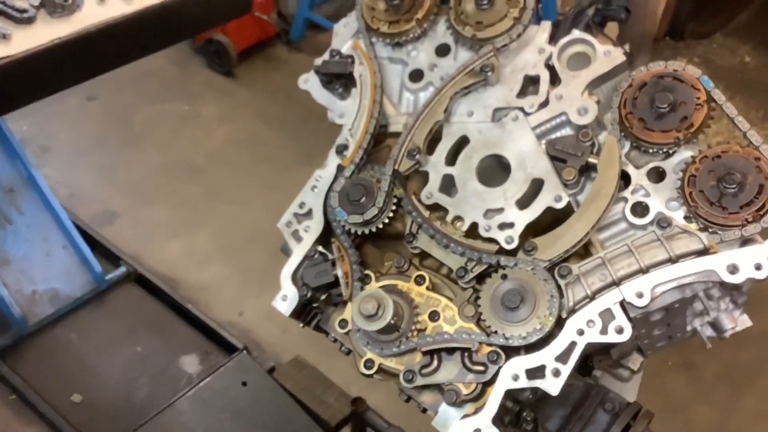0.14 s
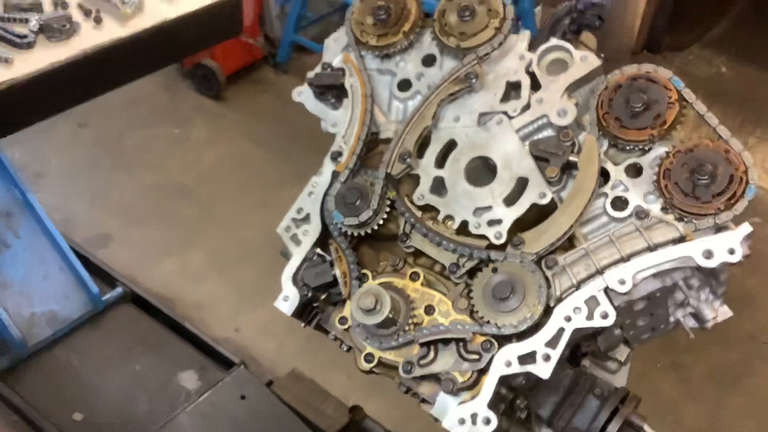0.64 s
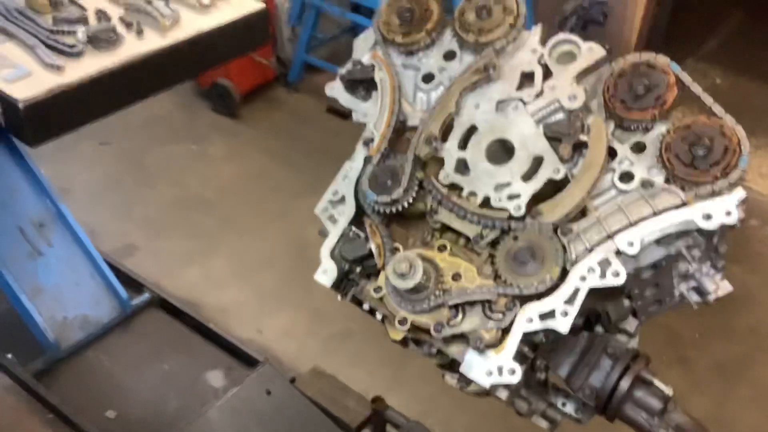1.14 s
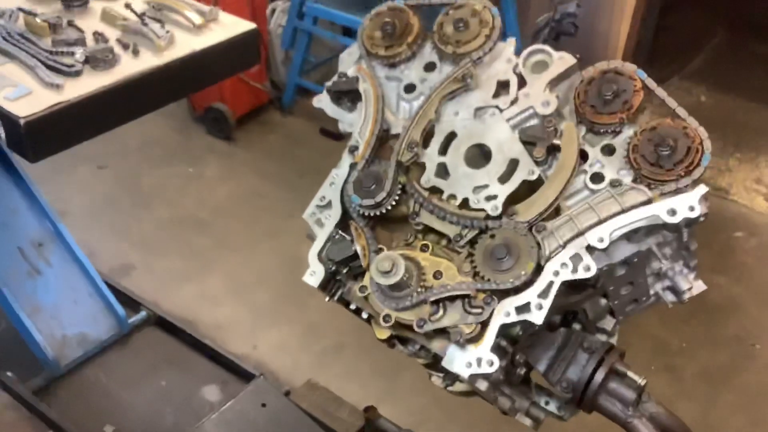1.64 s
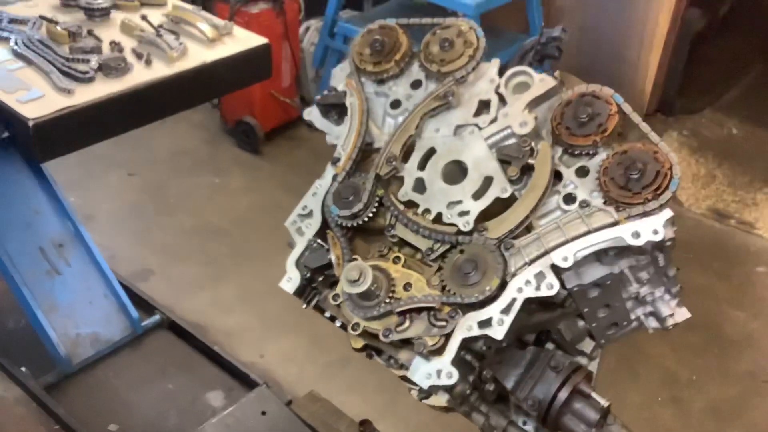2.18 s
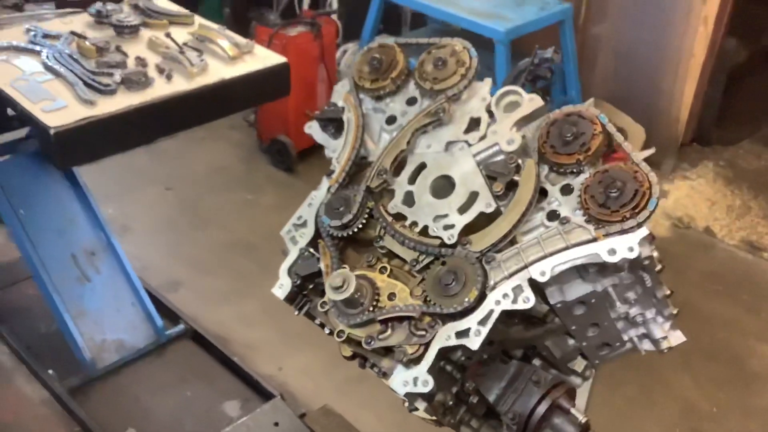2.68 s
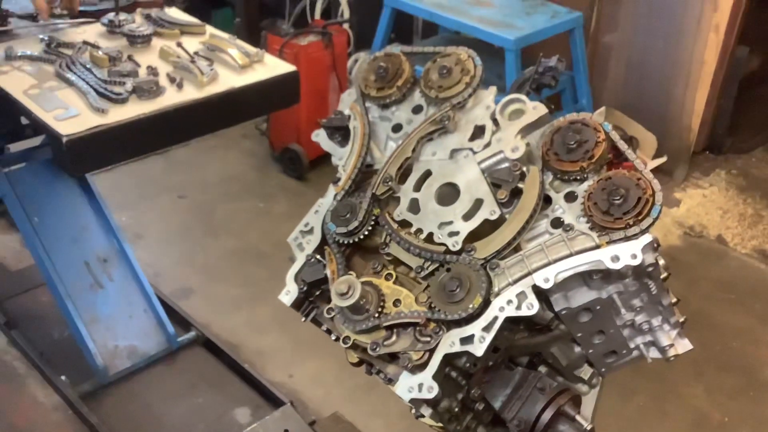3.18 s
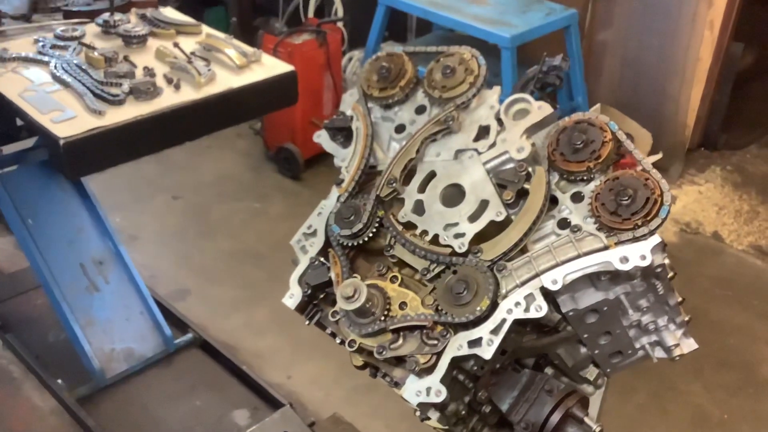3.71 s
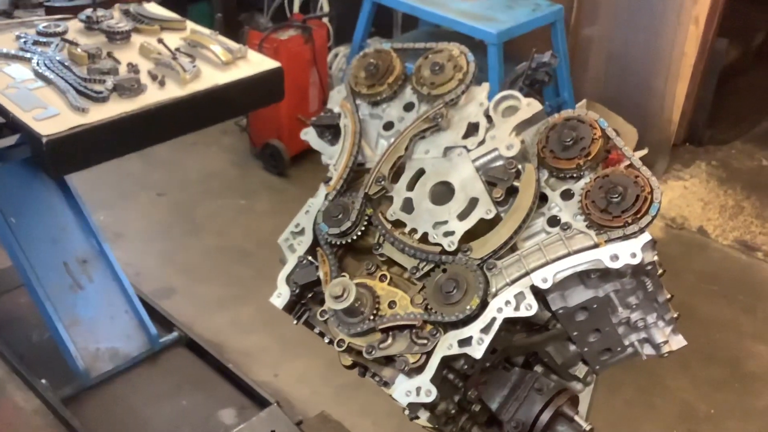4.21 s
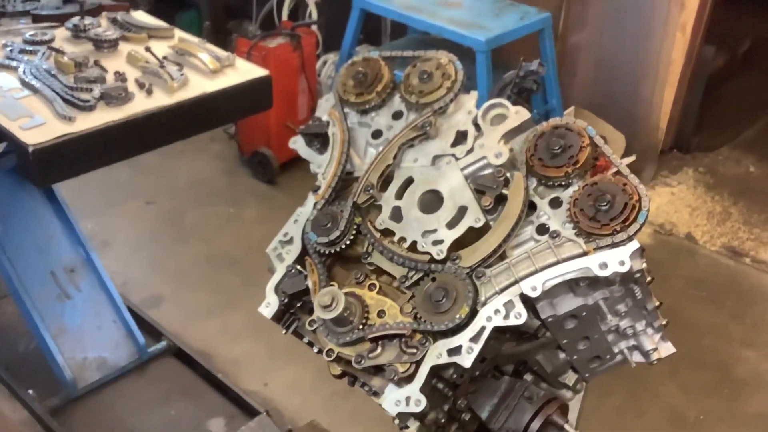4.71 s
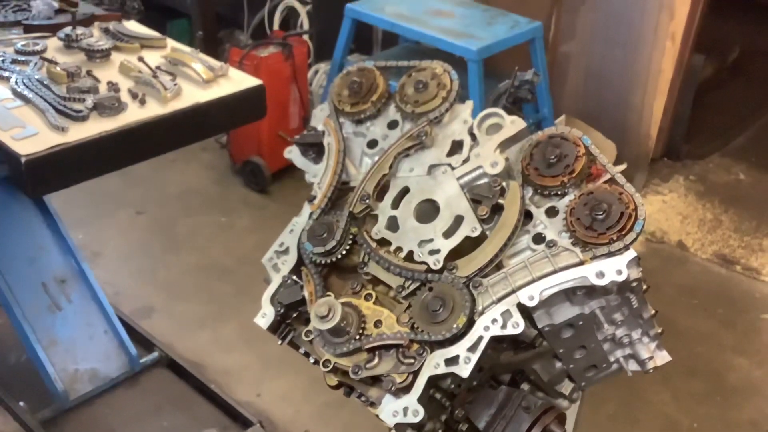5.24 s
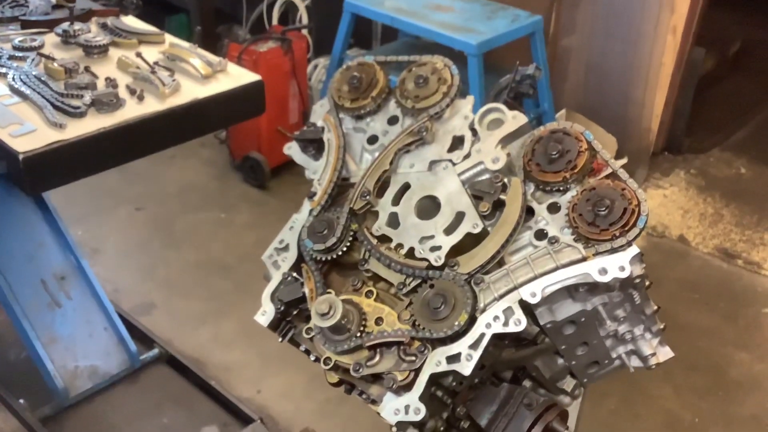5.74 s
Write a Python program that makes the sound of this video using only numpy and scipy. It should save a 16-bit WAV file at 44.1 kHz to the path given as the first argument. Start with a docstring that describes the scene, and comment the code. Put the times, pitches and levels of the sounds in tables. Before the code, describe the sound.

Metal engine parts clank hard on a workbench in a hard-walled garage, with thuds, small taps and clicks over a low steady hum.

```python
"""Metal parts on a garage workbench

Metal parts are knocked and set down on a bench in a hard-walled garage, a few metres from the microphone.
Each blow is a shaped click smeared by noise, with a thud that rings the modes of the bench.
Pings are noise through a resonance; a steel shaft rings in dying sines; faint low bench tones linger.
A small part is tapped; bumps and clicks, filtered puffs of noise, sound close to the microphone.
Dense echoes make the garage; a wavering mains hum, treble hiss and steady room noise lie beneath."""
import sys
import numpy as np
from scipy import signal
from scipy.fft import rfft, irfft
from scipy.io import wavfile
from scipy.ndimage import uniform_filter1d

SR = 44100
rng = np.random.default_rng(int(sys.argv[2]) if len(sys.argv) > 2 else 0)


def invert_db(level):
    """Linear amplitude ratio for a level in decibels (20 dB per decade), elementwise."""
    return 10 ** (np.asarray(level, dtype=float) / 20)


def generate_wav(sig):
    """Save sig (samples, or channels by samples) to the path in sys.argv[1] as 16-bit PCM at SR."""
    pcm = np.round(np.clip(np.atleast_2d(sig).T, -1, 1) * 32767).astype(np.int16)
    wavfile.write(sys.argv[1], SR, pcm)


N = 258757  # length in samples


def evened(x):
    """Scales to rms 1."""
    return x / np.sqrt(np.mean(x ** 2) + 1e-20)


def read(points, hz):
    """Reads a table along log frequency."""
    f, value = np.transpose(points)
    return np.interp(np.log(hz + 1), np.log(f + 1), value)


def coloured(x, points):
    """Filters by a spectrum in dB."""
    hz = np.fft.rfftfreq(len(x), 1 / SR)
    return irfft(rfft(x) * invert_db(read(points, hz)), len(x))


def slow_noise(width):
    """Noise averaged twice over width samples, rms 1."""
    once = uniform_filter1d(rng.standard_normal(N), width)
    return evened(uniform_filter1d(once, width))


def add(mix, s, sound):
    """Mixes a sound in at time s, in seconds."""
    part = mix[round(s * SR):][:len(sound)]
    part += sound[:len(part)]


def ringing(modes, phases):
    """One second of dying sines, one a mode; phases in cycles."""
    t = np.arange(SR) / SR
    total = np.zeros(SR)
    for (hz, db, t60), phase in zip(modes, phases):
        total += invert_db(db - 60 * t / t60) * np.sin(2 * np.pi * (hz * t + phase))
    return total


def burst(noise, rise_s, t60):
    """A rough push that rises fast and dies, energy 1."""
    t = np.arange(len(noise)) / SR
    push = noise * (1 - np.exp(-t / rise_s)) * invert_db(-60 * t / t60)
    return push / np.linalg.norm(push)


def puff(noise, hz, t60, rise_s, sharpness):
    """A rough push through one resonance taken twice, peak 1."""
    band = signal.iirpeak(hz, sharpness, SR)
    push = burst(noise, rise_s, np.clip(t60, .005, .3))
    sound = signal.lfilter(*band, signal.lfilter(*band, push))
    return sound / abs(sound).max()


def causal(db, size=2048):
    """A click of the given smooth spectrum that starts sharply (minimum phase)."""
    log_gain = np.log(invert_db(np.r_[db, db[-2:0:-1]]))
    return np.fft.ifft(np.exp(np.conj(signal.hilbert(log_gain)))).real[:size]


# Where a blow on the bench is shaped. In order: centres of thud, knock, clack, tick and sizzle in Hz.
CONTACT_HZ = [300, 900, 2300, 6000, 12000]


def contact(strength_db, weight_db, hardness_db):
    """One blow: a click whose lows grow with weight and whose treble grows with hardness."""
    thud_hz, knock_hz, clack_hz, tick_hz, sizzle_hz = CONTACT_HZ
    low_hz, low_db = 110, -27  # the fall below the thud
    # levels over the clack; the factors are dB per dB
    thud_db = 14.5 + weight_db
    knock_db = 5.5 + 0.52 * weight_db
    sizzle_db = -21.5 + 0.31 * hardness_db - 0.39 * strength_db
    shape = [(low_hz / 4, thud_db + 1.1 * low_db), (low_hz, thud_db + low_db),
             (thud_hz, thud_db), (knock_hz, knock_db), (clack_hz, 0),
             (tick_hz, hardness_db), (sizzle_hz, sizzle_db), (SR / 2, sizzle_db - 15)]
    spectrum_db = read(shape, np.fft.rfftfreq(4096, 1 / SR))
    return invert_db(strength_db) * causal(uniform_filter1d(spectrum_db, size=5))


# Modes of the bench under the parts. Each row: frequency in Hz, relative level in dB, t60 in seconds.
BENCH = [(218.8, -3.5, 0.3), (235.3, -2.5, .2), (272.4, -1.5, .15), (297, -1.5, .12), (329, -6, 0.079),
         (420, -6, .1), (507, -7, .1), (606, -5.5, .14), (697, -3.5, .12)]


def bench_ring(thuds):
    """The bench top answers the thuds with its modes, which swell in before they die."""
    swell = 1 - np.exp(-np.arange(SR) / (.005 * SR))
    modes = swell * ringing(BENCH, np.zeros(len(BENCH)))
    bench = invert_db(-34.5) * signal.fftconvolve(thuds, modes)[:N]
    # the bench sound is cut below 150 Hz
    return signal.sosfilt(signal.butter(2, 150, "high", fs=SR, output="sos"), bench)


# Blows on the bench, a few metres off. Each row: start in seconds, relative strength in dB,
# relative weight (thud over clack) in dB, hardness (tick over clack) in dB.
BLOWS = [(0.11, -55, 1, -11), (0.8536, 0.5, -38, -8), (0.8652, -11, -10, 8), (0.885, -15, -6, -21),
         (0.9397, -11.5, -19, -1.5), (1.4494, -73.5, 19, 19), (1.74, -64.5, -4.5, 7.5),
         (1.992, -15.5, -2, -22), (2.1654, -14, -1.5, -19), (2.2346, -29, 6, -15), (2.7325, -53, -5, -5),
         (2.7755, -54.5, 2.5, -13.5), (3, -78, 12, 27.5), (3.2889, -2, -21.5, -10.5),
         (3.3099, -8.5, -8, -17), (3.4225, -20, -8.5, -19), (3.4981, -20, -7, -24), (3.5876, -50.5, 9, -15),
         (3.7442, -33.5, -20.5, -25.5), (3.913, -41.5, -13, -28), (3.9334, -52.5, -4.5, -17),
         (4.178, -58, -2, 3), (4.3228, -52.5, -1, -12), (4.3562, -28, -19, -6.5), (4.7045, -18.5, 0, -15),
         (5.3502, -69.5, 17.5, 13), (5.4288, -69.5, 12, -1), (5.8281, -65.5, 19, 12.5)]


def blows():
    """Each blow clicks, chatters and pushes the bench; gentle ones smear into a short scrape.

    Returns the direct sound and the sound sent into the garage."""
    firm_db, gentle_span_db = -26, 12
    thud_lag_s, thud_edge_hz = .012, 600  # the lows travel through the bench and swell later
    lowpass = signal.butter(2, thud_edge_hz, fs=SR)
    blunt = np.hanning(48)  # the push of a blunt contact
    clicks, chatter, thuds = np.zeros((3, N))
    noise = rng.standard_normal((len(BLOWS), 4096))
    for (s, strength_db, weight_db, hardness_db), rough in zip(BLOWS, noise):
        click = contact(strength_db, weight_db, hardness_db)
        gentle = np.clip((firm_db - strength_db) / gentle_span_db, 0, 1)
        low = signal.lfilter(*lowpass, click)
        high_push = burst(rough, 0.007 + .004 * gentle, .028 + 0.12 * gentle)
        low_push = burst(rough[::-1], thud_lag_s, 0.042 + .03 * gentle)
        smeared = signal.fftconvolve(click - low, high_push) + signal.fftconvolve(low, low_push)
        add(chatter, s, smeared)
        add(clicks, s, (1 - gentle) * click)
        add(clicks, s, gentle * smeared)
        add(thuds, s, invert_db(strength_db + weight_db) * blunt)
    bench = bench_ring(thuds)
    direct = invert_db(23.0) * chatter + bench
    radiated = invert_db(25.0) * clicks + invert_db(-4) * bench
    return direct, radiated


# Modes of the steel shaft at the bench. Each row: frequency in Hz, relative level in dB, t60 in seconds.
SHAFT = [(8608, -17, .45), (9446, -7, .3), (9649, 0, .42), (9735, -5, .26)]
# Rings of the shaft and bursts at its lowest mode. Each row: start in seconds, relative level in dB,
# extra dB in the lowest mode.
RINGS = [(.8555, -10, -15), (0.878, -15, -12), (2.737, -62.5, -6), (2.78, -66, -6), (3.2866, -38.5, -4),
         (3.309, -46, 3.5), (3.391, -49, 23.5), (3.421, -44, 2), (3.553, -55, 12)]


def shaft():
    """Each row adds a fresh ring of the modes over the earlier ones; loose parts touch the ringing shaft and
    make it flicker."""
    mix = np.zeros(N)
    rise = 1 - np.exp(-np.arange(SR) / (.004 * SR))
    (low_hz, low_db, low_t60), *upper = SHAFT
    for (s, db, extra_db), phases in zip(RINGS, rng.random((len(RINGS), len(SHAFT)))):
        modes = [(low_hz, low_db + extra_db, low_t60), *upper]
        add(mix, s, invert_db(db) * rise * ringing(modes, phases))
    return mix * invert_db(2.26 * slow_noise(500))  # flicker of 2.26 dB rms


# Short pings and jingles with the blows, mostly around 2 kHz.
# Each row: start in seconds, peak level in dB before the overall colour, resonance in Hz.
PINGS = [(0.855, -12.5, 2020), (0.853, -10.5, 3070), (0.889, -13, 2740), (0.943, -18, 2800),
         (1.9903, -14.5, 1980), (2.1638, -11, 2460), (3.2877, -6.5, 2283), (3.3097, -7, 2120),
         (3.311, -32, 11500), (3.42, -30, 11000), (3.425, -22, 629), (3.4994, -21, 1490),
         (3.4988, -22.5, 2250), (3.739, -42, 2410), (3.7457, -38, 2260), (3.91, -45.5, 2313),
         (4.1789, -46.5, 2354), (4.32, -53.5, 2324), (4.343, -51, 2220), (4.3545, -32, 2390),
         (4.36, -30.5, 2166), (2.999, -50, 7000)]


def pings():
    """Each ping is a rough push through one narrower resonance."""
    mix = np.zeros(N)
    for (s, db, hz), noise in zip(PINGS, rng.standard_normal((len(PINGS), 4096))):
        add(mix, s, invert_db(db) * puff(noise, hz, t60=.038, rise_s=0.0024, sharpness=2.8))
    return mix


# Faint low tones of the bench that hang on after some blows.
# Each row: start in seconds, frequency in Hz, starting peak in dB before the overall colour, t60 in seconds.
LINGERS = [(.86, 770, -52, 1.56), (.86, 1053, -56, 1.65), (2.17, 1063, -55.5, 1.2), (2.24, 218, -45.5, 1.4),
           (3.3, 598.6, -54, 2.9)]


def lingers():
    """Each tone is one slowly dying sine, cut after two seconds."""
    mix = np.zeros(N)
    t = np.arange(2 * SR) / SR
    for (s, hz, db, t60), phase in zip(LINGERS, rng.random(len(LINGERS))):
        add(mix, s, invert_db(db - 60 * t / t60) * np.sin(2 * np.pi * (hz * t + phase)))
    return mix


# Modes of a small loose steel part near by. Each row: frequency in Hz, mean relative level in dB,
# t60 in seconds.
FITTING = [(5230, -7, 0.091), (5940, -5.5, 0.069), (7400, -2, .05), (8340, -2.5, 0.088), (8840, -1, 0.066),
           (9600, -8.5, 0.039)]
# Light taps of the small part. Each row: start in seconds, relative level in dB.
TAPS = [(3.8836, -63.5), (3.933, -58), (4.165, -60.5), (4.18, -54), (4.706, -41), (5.35, -57), (5.812, -62)]


def fitting():
    """Each tap is a short rattle that rings the small part, its modes a little differently each time."""
    mix = np.zeros(N)
    spread_db = 4
    for (s, db), draw in zip(TAPS, rng.standard_normal((len(TAPS), 2048))):
        modes = [(hz, mode_db + spread_db * d, t60) for (hz, mode_db, t60), d in zip(FITTING, draw[::-1])]
        ring = ringing(modes, np.zeros(len(FITTING)))
        rattle = burst(draw, 0.00083, .04)
        add(mix, s, invert_db(db) * signal.fftconvolve(ring, rattle))
    return mix


# Dull bumps close to the microphone, with little echo. Each row: start in seconds,
# peak level in dB before the overall colour, resonance in Hz, t60 of the push in seconds.
BUMPS = [(0.116, -43.5, 262, 0.065), (0.408, -41, 298, 0.051), (0.422, -41, 300, 0.07),
         (0.82, -49, 226, 0.044), (1.129, -40, 218, 0.073), (1.364, -41.5, 210, 0.039),
         (1.507, -43, 261, 0.057), (2.127, -24, 270.7, 0.15), (2.209, -22, 280, 0.13),
         (2.586, -48, 212.7, 0.053), (4.3879, -26.5, 560, 0.011), (4.391, -27.5, 273.4, 0.028),
         (5.349, -49, 499.6, 0.03), (5.533, -43, 216, 0.09), (5.829, -58.5, 664, 0.081)]
# Tiny dry clicks close to the microphone. Each row: start in seconds,
# peak level in dB before the overall colour, resonance in Hz.
CLICKS = [(.82, -56, 6500), (2.067, -63, 11000), (2.306, -44.5, 10500), (2.5302, -51, 9290),
          (2.642, -49, 9000), (2.663, -52.5, 10500), (2.674, -53.5, 7700), (2.733, -54, 10000),
          (2.748, -53.5, 11500), (3.001, -51, 12000), (3.042, -53.5, 8500), (3.062, -49.5, 8200),
          (2.6905, -51, 5240), (3.8845, -54.5, 9000), (3.953, -56, 11000), (3.9725, -50, 10000),
          (4.061, -54, 10500), (4.179, -45, 9500), (5.741, -50, 9000), (4.4699, -45, 8800),
          (4.488, -47, 9030), (4.5206, -50, 8200), (4.526, -48, 9500), (4.591, -50.5, 9500)]


def nearby():
    """Bumps and clicks close to the microphone, each a puff of noise through a broad resonance."""
    mix = np.zeros(N)
    for (s, db, hz, t60), noise in zip(BUMPS, rng.standard_normal((len(BUMPS), 8192))):
        add(mix, s, invert_db(db) * puff(noise, hz, t60, rise_s=0.0091, sharpness=1.0))
    for (s, db, hz), noise in zip(CLICKS, rng.standard_normal((len(CLICKS), 1024))):
        add(mix, s, invert_db(db) * puff(noise, hz, t60=0.0055, rise_s=0.00034, sharpness=1.4))
    return mix


# Decay of the hard-walled garage. Each row: frequency in Hz, t60 in seconds.
GARAGE = [(100, 0.51), (250, 0.36), (600, 0.35), (1500, 0.4), (3000, 0.41), (6000, 0.32), (10000, 0.31),
          (15000, 0.18)]


def garage(x):
    """Dense echoes of random sign that build up, each band dying at its own speed."""
    first_s, build_s, spacing = .006, 0.0035, 20  # spacing in samples
    echoes = np.zeros(SR)
    at = np.arange(round(first_s * SR), SR - spacing, spacing)
    jitter = rng.integers(0, spacing, len(at))
    echoes[at + jitter] = rng.choice([-1., 1.], len(at)) * (1 - np.exp(-at / (build_s * SR)))
    hz, t, bands = signal.stft(echoes, SR, nperseg=256)
    decay = invert_db(-60 * t / read(GARAGE, hz)[:, None])
    tail = signal.istft(bands * decay, SR, nperseg=256)[1]
    return signal.fftconvolve(x, tail / np.linalg.norm(tail))[:N]


def hum():
    """A mains hum: one sine whose level wavers slowly."""
    hz, level_db, waver_db = 119.5, -61.5, 2.0  # middle rms level before the overall colour, rms waver
    level = np.sqrt(2) * invert_db(level_db + waver_db * slow_noise(3000))
    return level * np.sin(2 * np.pi * hz * np.arange(N) / SR)


# Colour of the hiss in the room. Each row: frequency in Hz, relative level in dB.
HISS_COLOUR = [(2500, -24.5), (5000, -11), (8000, -5), (11000, -9.5), (15000, -15.5)]
# Soft swells of the hiss. Each row: centre in seconds, added rms level in dB before the overall colour,
# time from the centre down to 1/e in seconds.
SWELLS = [(0, -67.5, .08), (.7, -68, .5), (2.743, -72, .15), (3.798, -77.5, 0.46), (5.87, -67, 0.12)]


def hiss():
    """Treble noise: a faint steady level with a few soft swells."""
    t = np.arange(N) / SR
    level = np.full(N, invert_db(-79))
    for s, db, half in SWELLS:
        level += invert_db(db) * np.exp(-((t - s) / half) ** 2)
    return level * evened(coloured(rng.standard_normal(N), HISS_COLOUR))


# Colour of the steady noise in the garage. Each row: frequency in Hz, relative level in dB per Hz.
AIR = [(25, -26.5), (40, -1.5), (62, 4), (100, 0), (200, -4), (270, -5.5), (400, -12), (630, -11),
       (1000, -18), (2000, -21.5), (3500, -25.5), (7000, -30), (12000, -25.5), (16000, -23)]


def air():
    """The steady room noise: coloured noise at -60.5 dB rms before the overall colour."""
    return invert_db(-60.5) * evened(coloured(rng.standard_normal(N), AIR))


def scene():
    """Blows and small sounds heard direct and through the garage, over the room's noises."""
    direct, radiated = blows()
    near = nearby() + fitting()
    ring = shaft()
    ping = pings()
    echoes = garage(radiated + invert_db(-17.0) * near + invert_db(-4.5) * ring + invert_db(-15) * ping)
    background = lingers() + air() + hum() + hiss()
    return (direct + near + ring + ping + echoes + background)[None]


def roll_off(x):
    """The treble ends steeply here."""
    return signal.sosfilt(signal.butter(12, 16450, fs=SR, output="sos"), x)


# Overall colour of the sound, with its treble cut at the band edge. Each row: frequency in Hz, gain in dB.
OVERALL_COLOUR = [(20, -18.5), (35, -5), (60, 2.5), (9800, 2.5), (10500, -4), (13000, -8), (15600, -10),
                  (16300, -39)]


def record(dry):
    """Overall colour, a limiter that holds down the loudest blows, and a softly rounding input stage."""
    knee_db, squeeze = -14, 0.28  # squeeze: dB taken off per dB over the knee
    recover_db = 150  # fall of the limiter's level follower, dB a second
    heard = coloured(dry[0], OVERALL_COLOUR)
    power_db = 10 * np.log10(abs(uniform_filter1d(heard ** 2, 64)) + 1e-12)
    fall = np.arange(N) * recover_db / SR
    followed_db = np.maximum.accumulate(power_db + fall) - fall
    over_db = np.maximum(followed_db - knee_db, 0)
    held = heard / invert_db(squeeze * uniform_filter1d(over_db, 64))
    rounded = np.tanh(held)  # the input stage rounds off the highest peaks
    return roll_off(rounded[None])


dry = scene()
out = record(dry)
generate_wav(out)
```